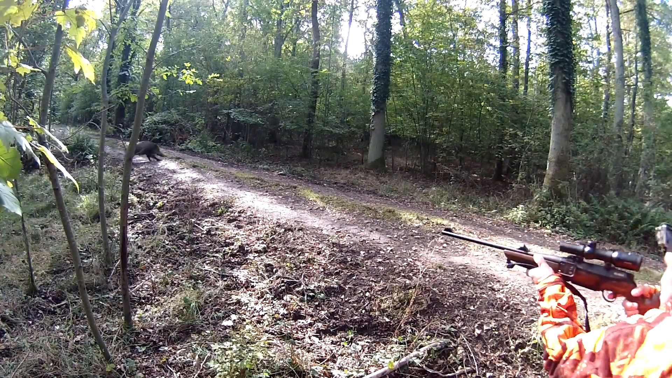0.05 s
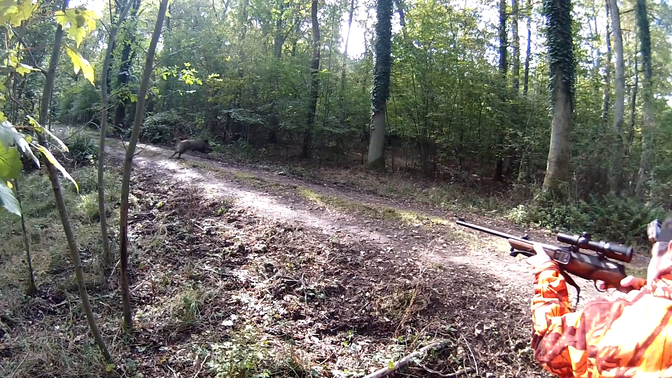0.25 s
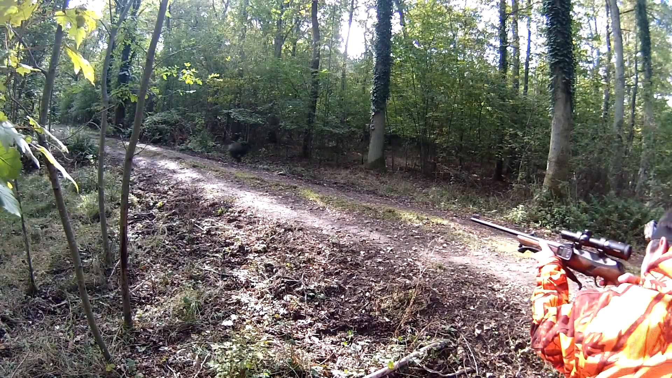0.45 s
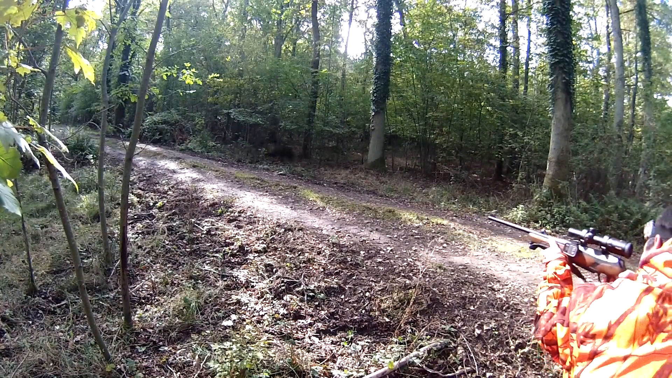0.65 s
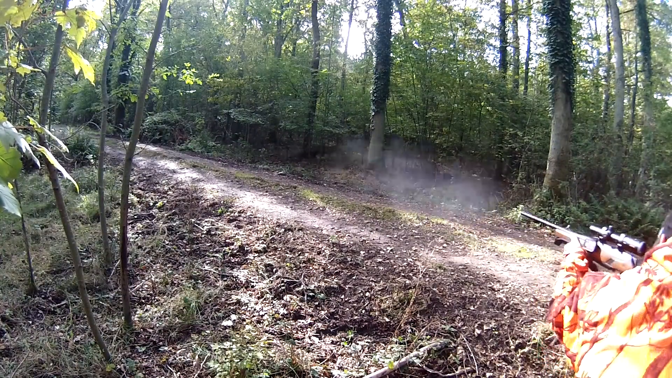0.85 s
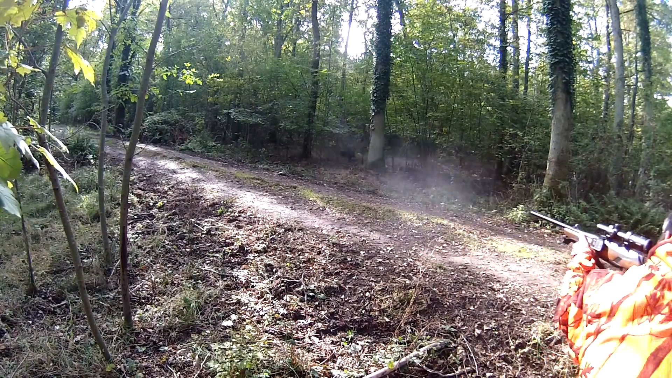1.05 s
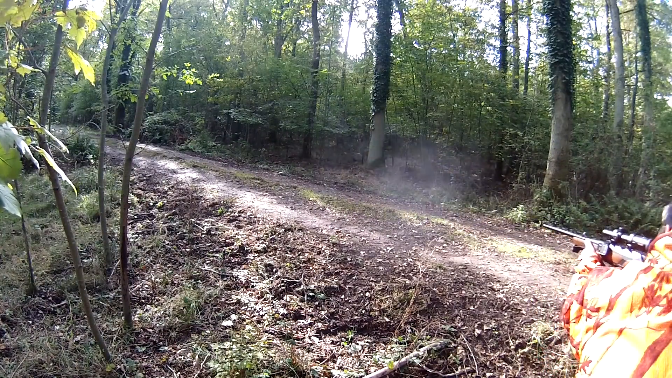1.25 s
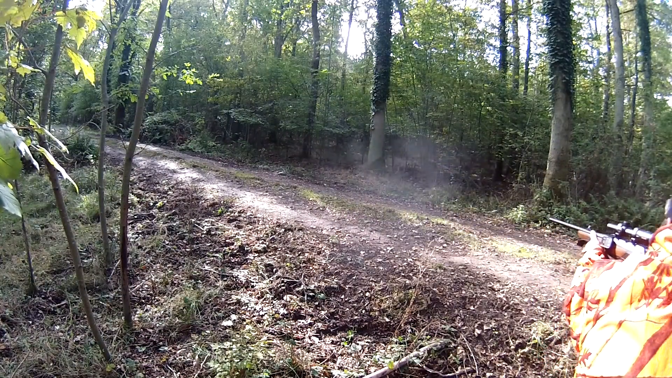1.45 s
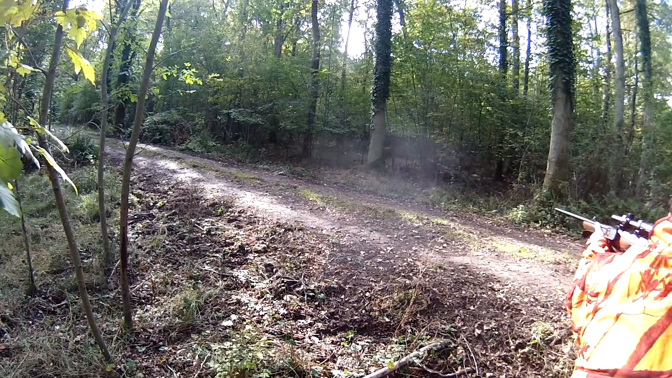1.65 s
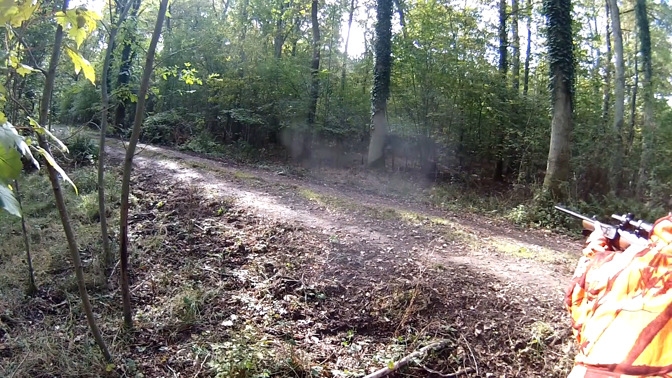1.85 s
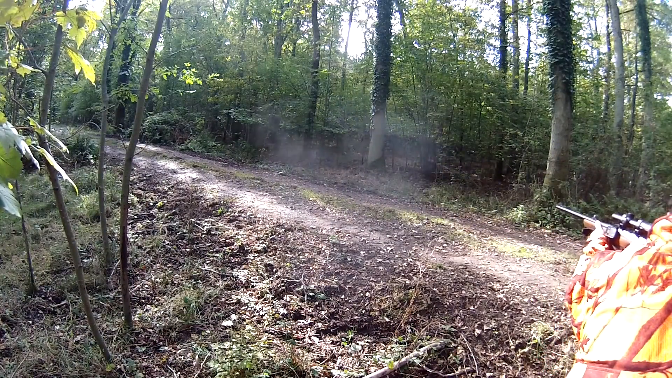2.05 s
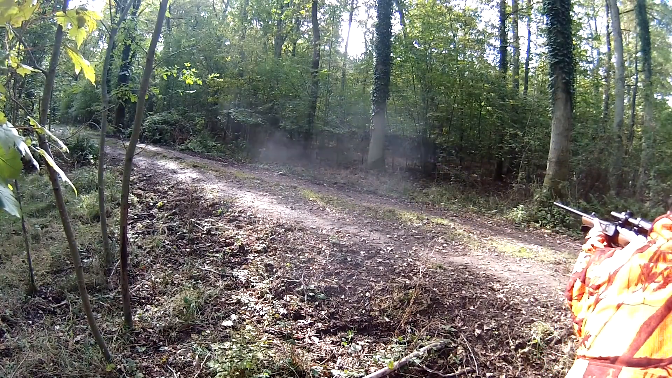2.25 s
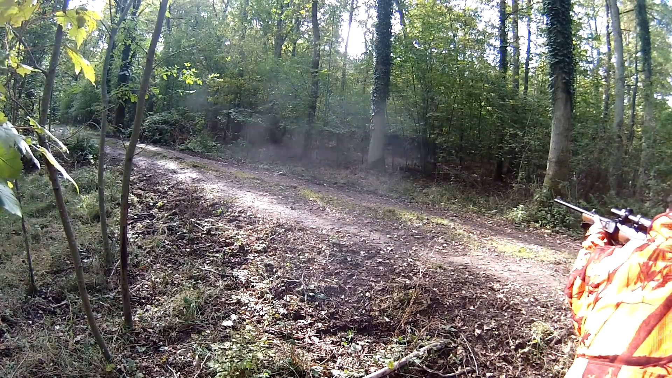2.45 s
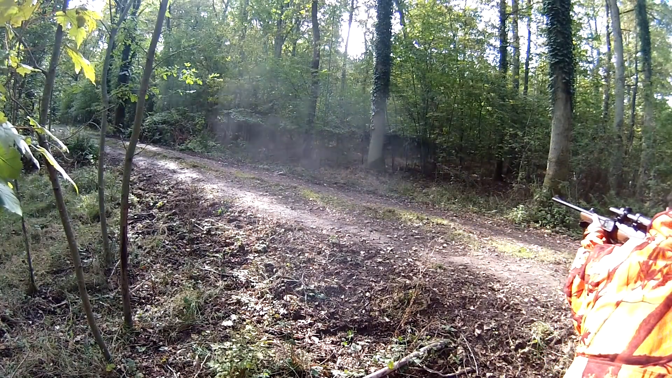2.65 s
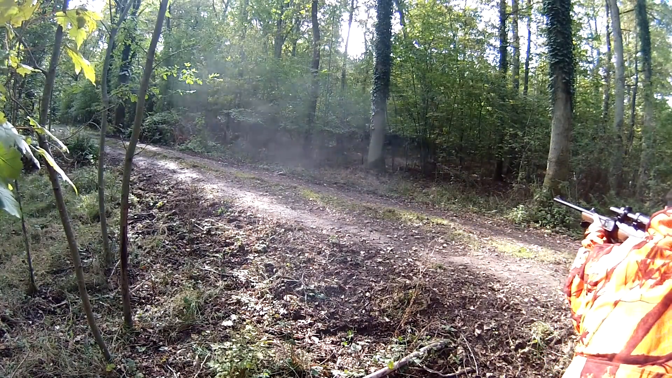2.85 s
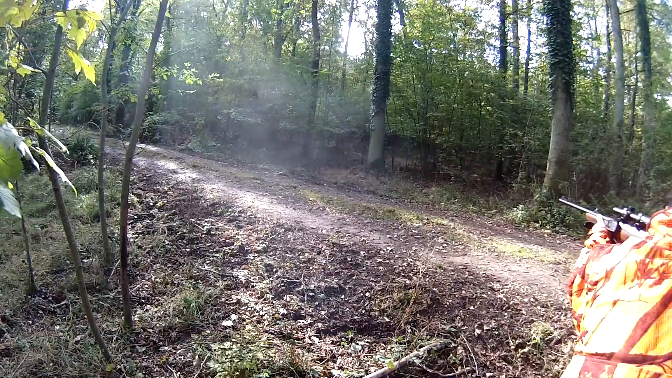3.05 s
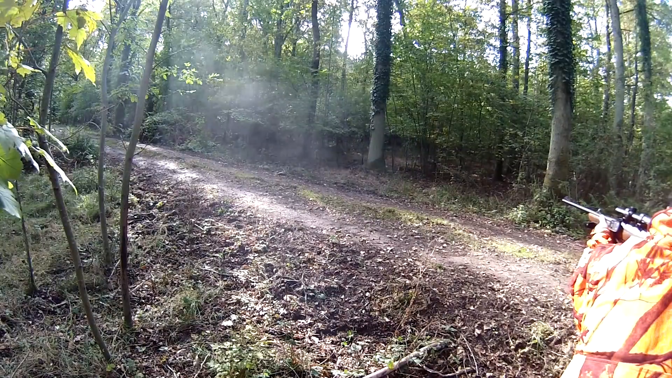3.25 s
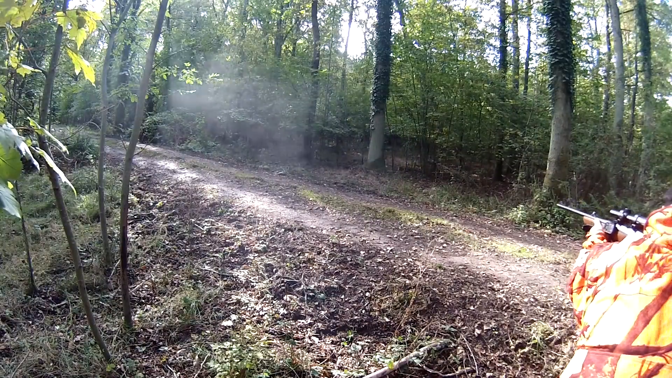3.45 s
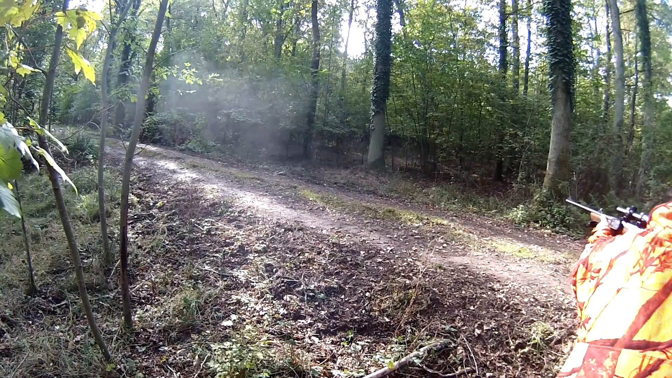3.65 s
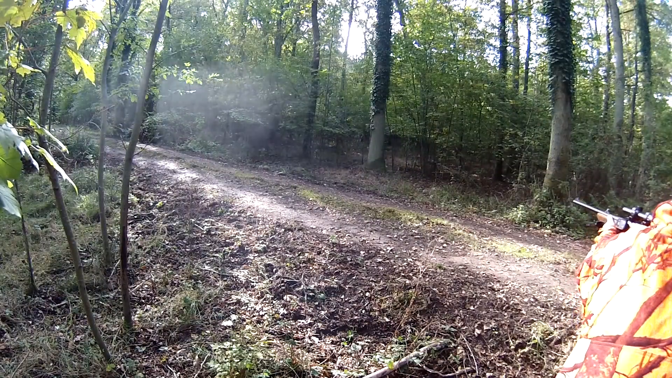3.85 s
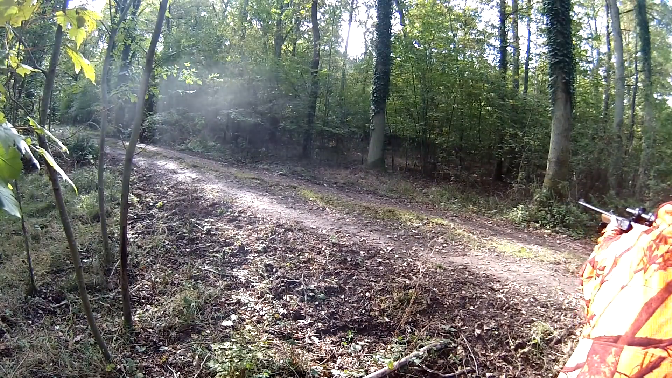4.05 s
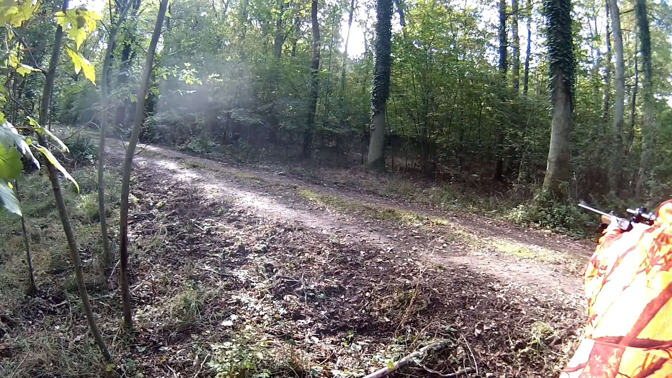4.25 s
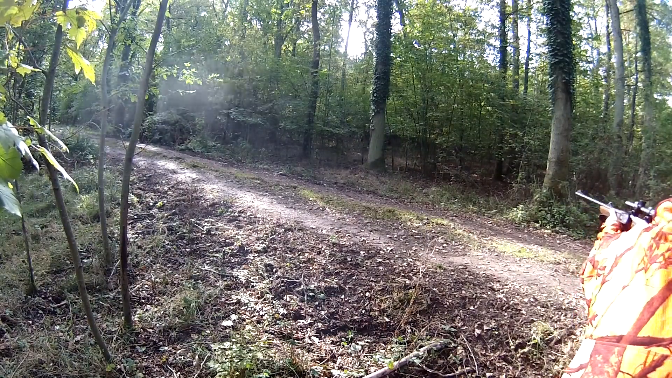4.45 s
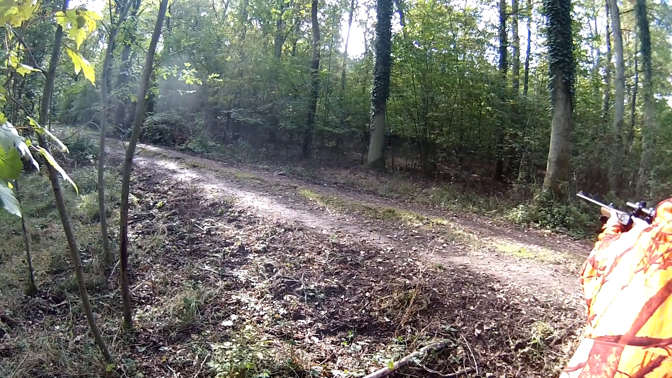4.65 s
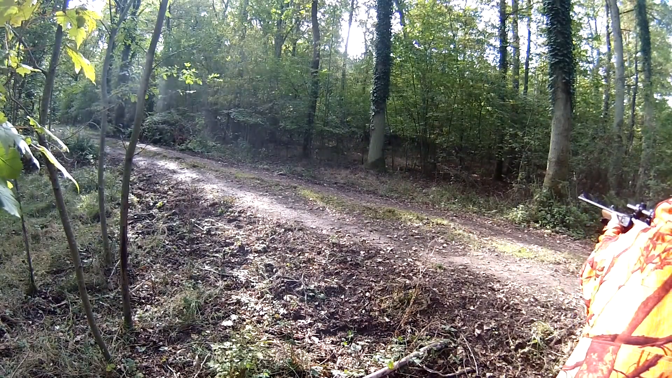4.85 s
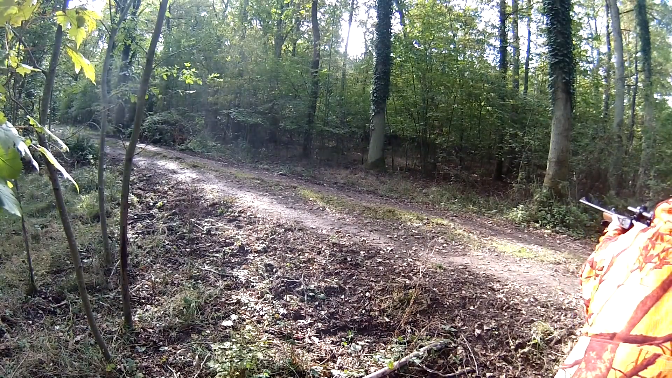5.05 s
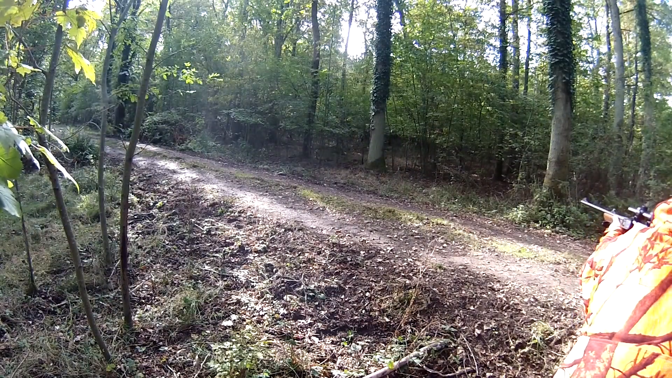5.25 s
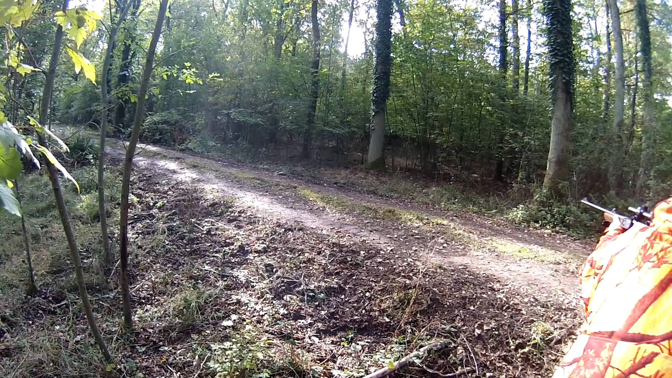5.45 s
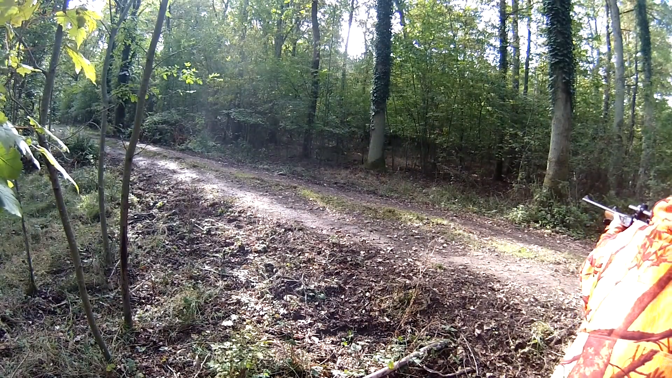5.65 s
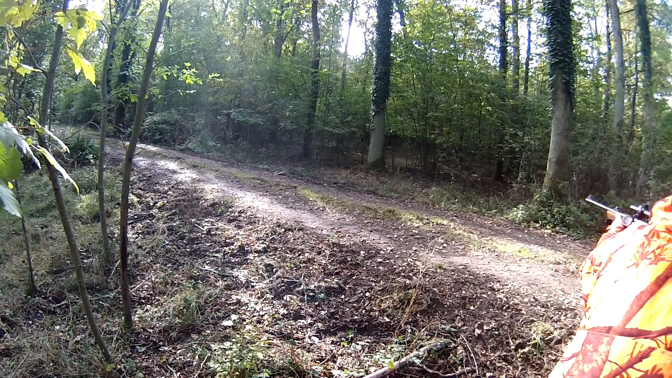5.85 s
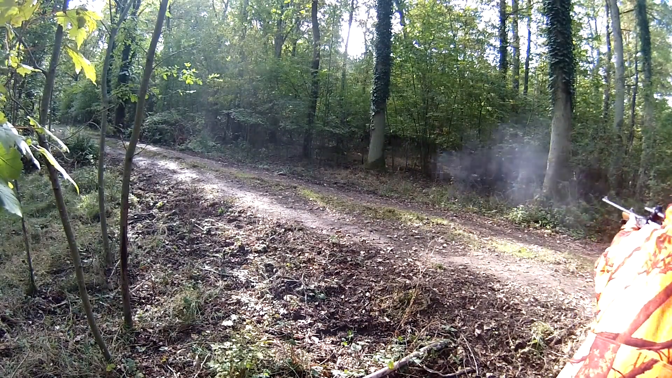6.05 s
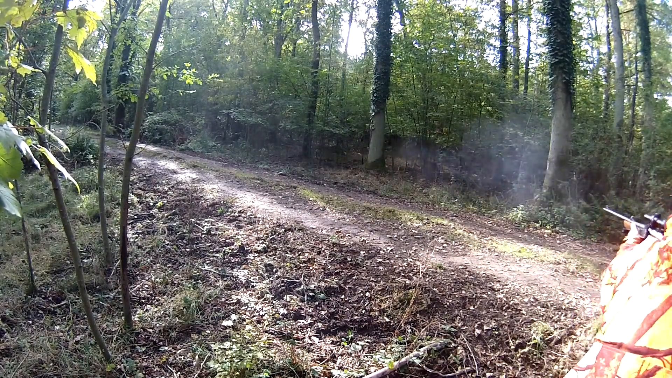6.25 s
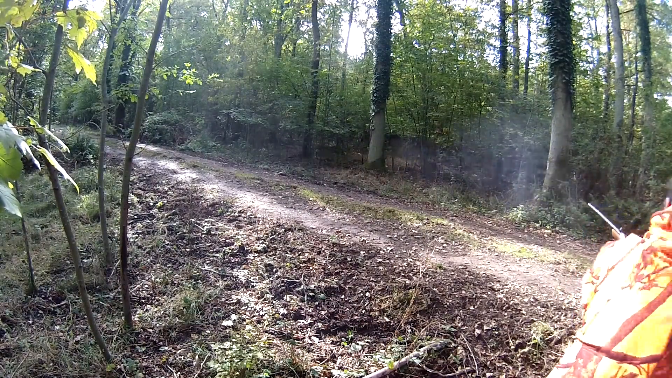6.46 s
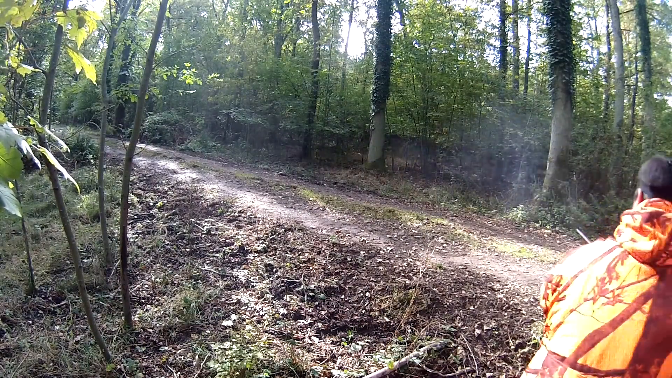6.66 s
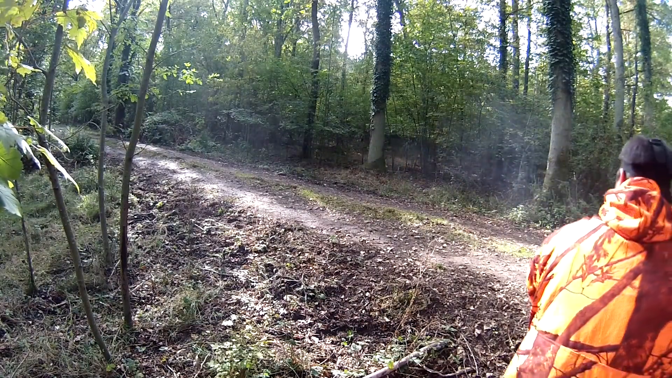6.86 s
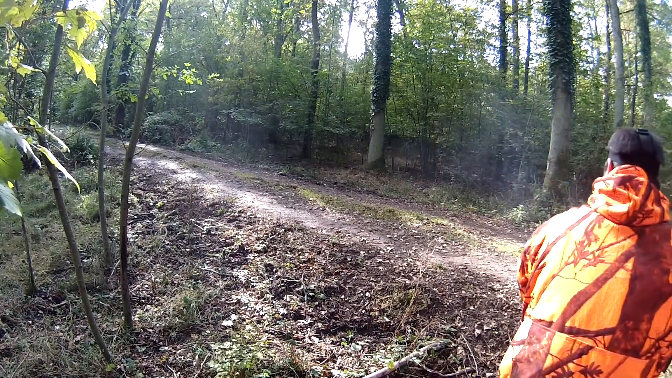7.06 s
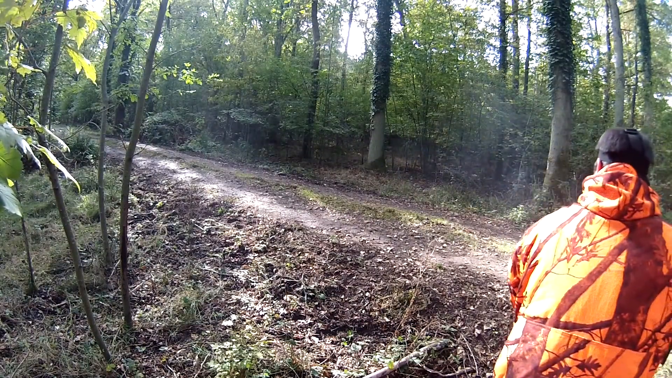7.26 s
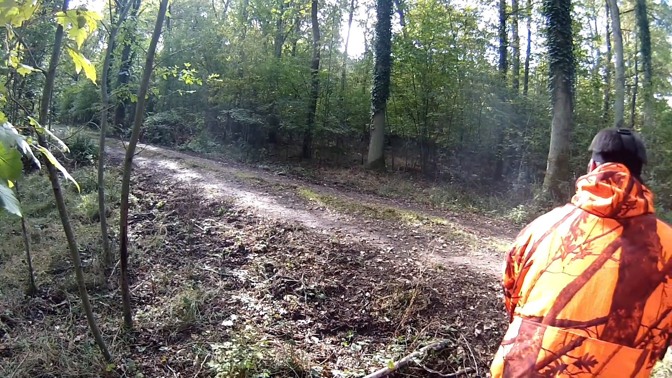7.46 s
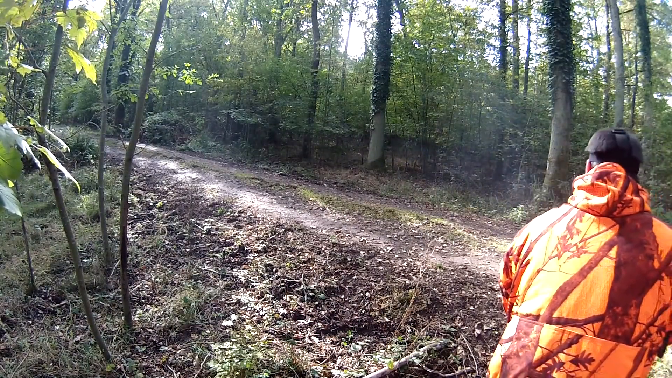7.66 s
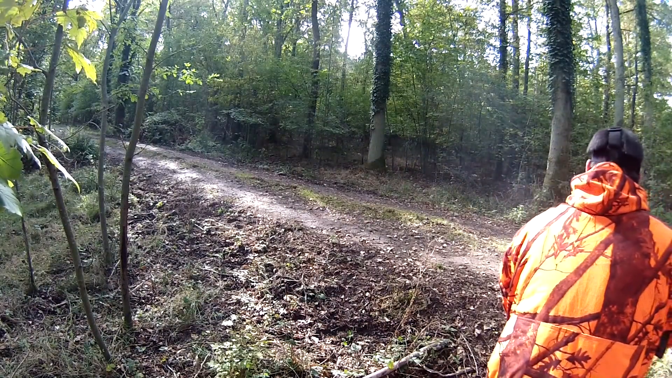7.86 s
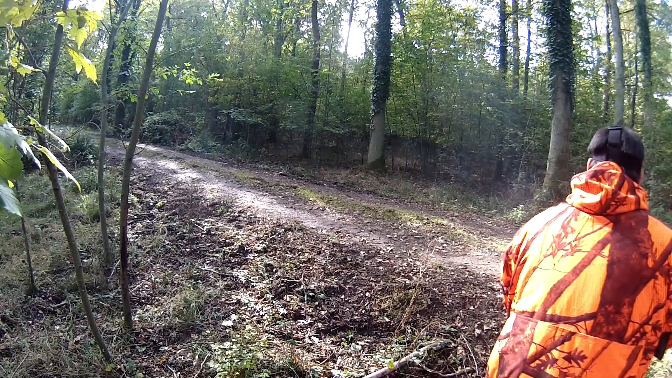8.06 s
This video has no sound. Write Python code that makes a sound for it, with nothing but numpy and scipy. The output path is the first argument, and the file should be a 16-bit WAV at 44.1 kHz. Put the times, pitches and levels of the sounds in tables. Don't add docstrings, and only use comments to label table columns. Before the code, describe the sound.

Two close, overloaded rifle shots about five seconds apart in a wood, each with a long rolling echo, and a metallic bolt clatter between them.

```python
import sys
import numpy as np
from scipy import signal
from scipy.fft import rfft, irfft, next_fast_len
from scipy.io import wavfile
from scipy.ndimage import uniform_filter1d

SR = 44100
rng = np.random.default_rng(int(sys.argv[2]) if len(sys.argv) > 2 else 0)


def decibels_to_gain(level_db):
    exponent = np.asarray(level_db, float) / 20
    return 10 ** exponent


def put_to_file(sound):
    columns = np.atleast_2d(sound).T
    safe = np.clip(columns, -1, 1)
    whole_steps = np.round(safe * 32767)
    wavfile.write(sys.argv[1], SR, whole_steps.astype(np.int16))


N = 357542
T = np.arange(N) / SR
SIZE = next_fast_len(N, real=True)
HZ = np.fft.rfftfreq(SIZE, 1 / SR)
BASS_CUT_HZ, TOP_HZ = 160, 15300

# t/s, crackle level/dB, depth of gain duck/dB, gain recovery/(dB/s)
SHOTS = [
    (0.8263, 27.5, 33.5, 34),
    (5.9788, 20.5, 33, 32.5),
]


def on_log(hz, table):
    f, v = np.transpose(table)
    return np.interp(np.log(np.maximum(hz, 1)), np.log(f), v)


def band(x, hz, width):
    return signal.lfilter(*signal.iirpeak(hz, hz / width, fs=SR), x)


def low_pass(x, hz):
    return signal.lfilter(*signal.butter(2, hz, fs=SR), x)


def unit(x):
    return x / np.sqrt(np.mean(x ** 2))


def add(out, s, x):
    i = int(s * SR)
    out[i:i + len(x)] += x[:N - i]


def walk(rate):
    k = int(SR / rate)
    steps = np.repeat(rng.standard_normal(N // k + 1), k)
    return 1.3 * uniform_filter1d(uniform_filter1d(steps, k), k)[:N]


def age(s):
    return np.min([(s - shot[0]) % 100 for shot in SHOTS], axis=0)


def duck_db():
    gain = np.zeros(N)
    for s, _, depth_db, rate_db in SHOTS:
        since = T - s - .003
        attack = np.clip(since / 0.0078, 0, 1)
        gain -= attack * np.maximum(depth_db - rate_db * since, 0)
    return gain


def hiss():
    # f/Hz, level/dB
    colour = [(15, -35.5), (25, -8), (170, 1), (500, -6), (1690, -16.5), (9520, -27), (14700, -26.5),
              (15900, -47)]
    # f/Hz, level/dB
    whines = [(10519, -80.5), (660, -75.0)]
    level_db, side_db = -67.5, -75.5
    mid, side = rfft(rng.standard_normal((2, N)), SIZE) * (HZ < TOP_HZ)
    mid *= decibels_to_gain(on_log(HZ, colour)) * np.hypot(1, BASS_CUT_HZ / np.maximum(HZ, 20))
    scale = decibels_to_gain(level_db) / np.std(irfft(mid * (HZ > 1500), SIZE))
    common = scale * irfft(mid, SIZE)[:N]
    opposed = decibels_to_gain(side_db) * unit(irfft(side, SIZE)[:N]) * np.array([[1], [-1]])
    drift = np.cumsum(walk(60)) / SR
    whine = sum(decibels_to_gain(db + 4.0) * np.sin(2 * np.pi * hz * T + 16.0 * drift) for hz, db in whines)
    return common + opposed + whine


def boom():
    # t/s, level/dB, hold/s, f/Hz, pitch sag/(Hz/s)
    booms = [
        (.005, -50, 0.31, 248.4, 120),
        (3.72, -67, .25, 426, 77),
        (5.2, -61, .04, 540, 5),
        (5.285, -53, 0.052, 546, 5),
    ]
    attack_s, release_db_per_s = 0.01, 200
    out = np.zeros(N)
    for (s, db, hold, hz, sag), chance in zip(booms, rng.standard_normal((len(booms), 2, N))):
        throb = unit(low_pass(chance, 26))
        since = np.maximum(T - s, 0)
        phase = 2 * np.pi * (hz - sag * np.minimum(since, 1) / 2) * since
        fall_db = release_db_per_s * np.maximum(since - attack_s - hold, 0)
        level = np.clip(since / attack_s, 0, 1) * decibels_to_gain(db - fall_db)
        out += level * (throb[0] * np.cos(phase) + throb[1] * np.sin(phase))
    return out


def bolt():
    # t/s, peak level/dB, treble minus peak/dB, rattle length/ms
    strikes = [(4.072, -48.5, -8, 5.7), (4.108, -34, -11, 12.5), (4.133, -42, -10, 5.4),
               (4.138, -31, -15, 9.9), (4.156, -36, -6, 12), (4.164, -18, -4.5, 3.4),
               (4.171, -30.5, 0.5, 3.7), (4.182, -38, -2, 4.4), (4.199, -50, 2, 4.0),
               (4.289, -34, -11, 8.3), (4.302, -38, -12, 5.9), (4.3125, -29, -15, 4.5),
               (4.321, -27.5, -11, 5.6), (4.332, -27, -3.5, 5), (4.34, -26.5, -9, 5), (4.35, -38, -9, 4.7),
               (4.369, -51, -10, 4.0)]
    # t/s, peak level/dB, treble minus peak/dB, rattle length/ms
    ticks = [(0.014, -44, -13.5, 2.7), (0.127, -48, -24, 4.7), (0.144, -45, -8, 5), (0.155, -48, -6, 3.0),
             (0.173, -42.5, -10.5, 5.1), (2.328, -53, -18, 3.1), (2.359, -55, -18.5, 3.0),
             (2.401, -53.5, -17.5, 2.5), (2.455, -48, -12, 3.0), (3.57, -50, -13.5, 3.1),
             (3.599, -53, -6, 2.97), (3.629, -50, -11, 3.6), (4.824, -57.5, 3, 4.3),
             (0.8175, -50, 2.5, 2.1), (5.969, -55.5, 2.5, 3.0)]
    # f/Hz, width/Hz, level/dB
    steel = [(433, 150, -17), (760, 240, -12.5), (1365, 210, -5), (1990, 410, -6), (2490, 290, -6.5),
             (3320, 600, 0), (4740, 1900, 1), (6340, 3800, -4), (9400, 2200, -15.5)]
    case_s, case_hz, case_db, case_t60_s = 4.166, 9695, -55.0, .25
    out = np.zeros(N)
    t = np.arange(int(.05 * SR)) / SR
    hits = strikes + ticks
    for (s, db, treble_db, ms), grit in zip(hits, rng.standard_normal((len(hits), 2, len(t)))):
        rattle = grit[0] * decibels_to_gain(2.9 * grit[1]) * np.exp(-t * 1000 / max(ms, .3))
        ring = np.zeros(len(t))
        for k, (f, width, mode_db) in enumerate(steel):
            gain = (-1) ** k * decibels_to_gain(mode_db + (f > 3000) * treble_db)
            ring += gain * band(rattle, f, width) / np.sqrt(width / 300)
        add(out, s, decibels_to_gain(db + 12.0) * low_pass(ring, 14400))
    t = np.arange(int(.5 * SR)) / SR
    power = np.maximum(signal.fftconvolve(out ** 2, decibels_to_gain(-120 * t / 0.56))[:N], 0)
    haze = band(rng.standard_normal(N), 2870, 3600)
    out += decibels_to_gain(-47.0) * np.sqrt(power) * unit(low_pass(low_pass(haze, 6400), 6400))
    add(out, case_s, decibels_to_gain(case_db - 60 * t / case_t60_s) * np.sin(2 * np.pi * case_hz * t))
    return out


def rumble_power(hz, bass, t):
    # peak t/s, level/dB, swell/s, fade/s, treble loss/(dB/octave)
    rumbles = [
        (.05, -60.5, 0.099, 0.26, 7),
        (.6, -60.5, 0.098, 0.28, 12),
        (3.04, -56.5, 0.036, 0.071, 10),
        (3.3, -61.5, 0.21, 0.32, 15),
        (3.75, -59.5, 0.13, 0.12, 19),
        (4.6, -72, 0.079, .2, 11),
        (5.15, -60, 0.13, .25, 30),
        (5.33, -57, .12, .26, 10),
        (5.8, -70.5, 0.028, 0.14, 19),
    ]
    power = np.zeros(len(t))
    for s, db, swell, fade, loss_db in rumbles:
        shape = np.exp(-np.where(t < s, ((s - t) / swell) ** 2, (t - s) / fade * 2))
        tilt_db = 9.5 * bass - loss_db * max(np.log2(hz / 543), 0)
        power += decibels_to_gain(2 * (db + tilt_db)) * shape
    return power


def echo_power(hz, bass, t):
    # level 1 s on/dB, brightness/(dB/octave), spreading/(dB/decade of time), air loss at 1 kHz/(dB/s)
    rolls = [
        (-39, 0.25, 41.5, 4.5),
        (-37, 1.0, 42, 4.5),
    ]
    nearest_s, rise_s = .17, .04
    power = np.zeros(len(t))
    for (s, *_), (level_db, bright_db, spread_db, air_db) in zip(SHOTS, rolls):
        since = np.maximum(t - s, 0)
        db = level_db + bright_db * np.log2(hz / 500) - spread_db * np.log10(since + nearest_s)
        db -= air_db * (hz / 1000) ** 1.25 * since ** 1.3
        db += 11.5 * bass * np.exp(-since / 0.2)
        power += decibels_to_gain(2 * db) * np.clip(since / rise_s, 0, 1) ** 2
    return power


def roll():
    # f/Hz, level/dB
    colour = [(40, -23.5), (125, -15), (270, -4.5), (450, 1), (1300, 3), (4000, -1), (5800, -5),
              (14000, -41.5)]
    freqs = np.maximum(HZ, 20)
    octaves = np.log2(freqs)
    fronts = rng.standard_normal(N) * decibels_to_gain(.6 * walk(90))
    spectrum = rfft(fronts, SIZE) * decibels_to_gain(on_log(freqs, colour)) / np.sqrt(freqs)
    coarse = T[::64]
    patchy = decibels_to_gain(.3 * walk(9)[::64] + 45.5)
    out = np.zeros(N)
    for hz in 40 * 2 ** np.arange(0, 8.6, 1 / 4):
        shape = np.cos(np.pi / 2 * np.clip(4 * (octaves - np.log2(hz)), -1, 1)) ** 2
        bass = 1 / (1 + (hz / 290) ** 4)
        power = rumble_power(hz, bass, coarse) + echo_power(hz, bass, coarse)
        level = np.interp(T, coarse, np.sqrt(power) * patchy)
        out += level * irfft(spectrum * shape, SIZE)[:N]
    return out


def rustle():
    # centre t/s, level/dB, half length/s
    rustles = [
        (.15, -67, 0.047),
        (2.36, -71, .07),
        (2.45, -68, 0.027),
        (3.594, -72, .05),
    ]
    grains = rng.standard_normal(N) * decibels_to_gain(4.4 * walk(250))
    swell = sum(decibels_to_gain(db) * np.exp(-((T - s) / half) ** 2) for s, db, half in rustles)
    cloth = band(band(grains, 3000, 5000), 3000, 5000)
    return swell * unit(low_pass(cloth, 5500))


def blast(crackle_db):
    t = np.arange(int(.03 * SR)) / SR
    front = decibels_to_gain(23.5) * (1 - t / 0.00012) * np.exp(-t / 0.0005)
    late = np.maximum(t - .0012, 0)
    rebound = -decibels_to_gain(26.0) * np.sin(2 * np.pi * 270 * late) * np.exp(-(late / .006) ** 2)
    gas = unit(low_pass(band(rng.standard_normal(len(t)), 910, 1300), 9100))
    crackle = decibels_to_gain(crackle_db) * gas * np.exp(-(t / 0.0032) ** 2)
    tail = decibels_to_gain(19.5) * low_pass(low_pass(gas, 5000), 3400) * np.exp(-t / 0.014)
    return front + rebound + crackle + tail


def rifle():
    out = np.zeros(N)
    t = np.arange(int(.004 * SR)) / SR
    half = int(.03 * SR)
    fade = np.hanning(2 * half)[half:]
    for s, crackle_db, *_ in SHOTS:
        add(out, s, blast(crackle_db) * fade)
        scrape = unit(low_pass(band(rng.standard_normal(len(t)), 2200, 2000), 3700))
        knock = np.sin(2 * np.pi * 450 * t) + .4 * scrape
        add(out, s - .0026, decibels_to_gain(-17.5) * knock * np.clip(t / .0006, 0, 1))
    return out


def trunks():
    # t/s, thump level/dB, crack minus thump/dB, thump f/Hz
    echoes = [(0.8588, -18.5, -7, 298), (0.887, -24.5, -3, 241), (0.9087, -36, 3, 400),
              (0.919, -42, 12, 450), (0.9407, -28, -19, 350), (0.966, -28.5, -18, 346),
              (.9745, -34, -2, 350), (1.064, -32, -14, 350), (6.0094, -15.5, -6, 290),
              (6.0387, -31.5, 7, 246), (6.058, -22.5, -9, 995), (6.095, -29.5, -16, 350),
              (6.12, -29, -19, 293), (6.143, -41, -9, 450), (6.18, -27, -6, 1210)]
    out = np.zeros(N)
    t = np.arange(int(.012 * SR)) / SR
    front = (1 - t / .0003) * np.exp(-t / .00025)
    for (s, db, crack_db, hz), bark in zip(echoes, rng.standard_normal((len(echoes), len(t)))):
        turns = hz * np.maximum(t - .0003, 0)
        thump = -np.sin(2 * np.pi * turns ** .85) * np.exp(-(turns / .82) ** 2)
        crack = front + 0.33 * band(bark, 2000, 2500) * np.exp(-t / 0.002)
        dull_hz = np.clip(250 / age(s) ** .9, 1500, 7000)
        crack = decibels_to_gain(crack_db + 9.5) * low_pass(low_pass(crack, dull_hz), dull_hz)
        add(out, s, decibels_to_gain(db + 4.5) * (low_pass(thump, 3000) + crack))
    return out


def scene():
    wood = trunks() * decibels_to_gain(-duck_db()) + roll() + boom() + bolt() + rustle()
    air = rifle() + wood
    port = decibels_to_gain(-4) * band(air, 4600, 670)
    return air + port + hiss()


def roll_off(x):
    return signal.sosfilt(signal.butter(12, 16050, fs=SR, output="sos"), x)


def record(dry):
    x = np.clip(dry * decibels_to_gain(duck_db()), -1.05, 1.05)
    x = signal.lfilter(*signal.butter(1, BASS_CUT_HZ, "high", fs=SR), x)
    split = uniform_filter1d(x[0] ** 2, size=128) * decibels_to_gain(-36) * rng.standard_normal(N)
    x = x + split * np.array([[1], [-1]])
    x = signal.sosfilt(signal.ellip(8, .2, 60, TOP_HZ + 200, fs=SR, output="sos"), x)
    return roll_off(np.clip(x, -1, 1))


dry = scene()
out = record(dry)
put_to_file(out)
```